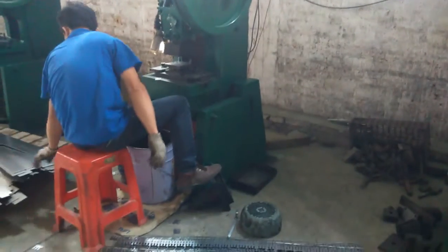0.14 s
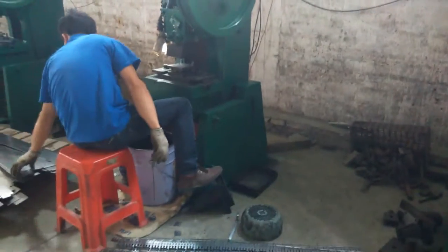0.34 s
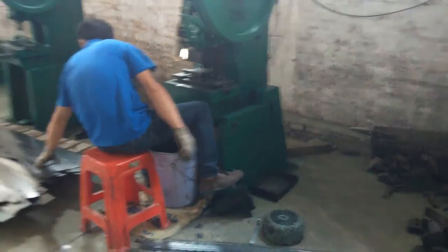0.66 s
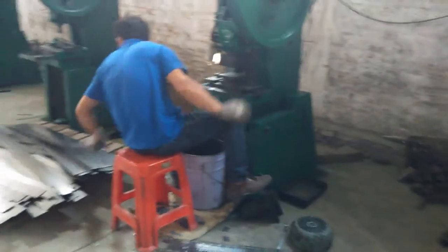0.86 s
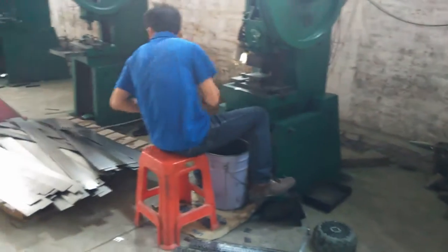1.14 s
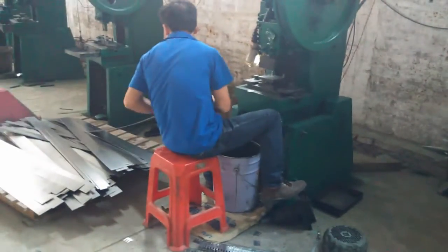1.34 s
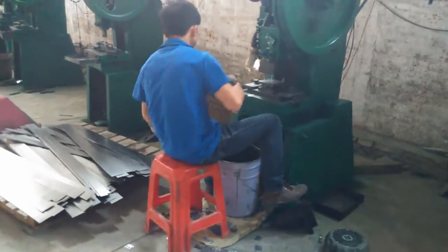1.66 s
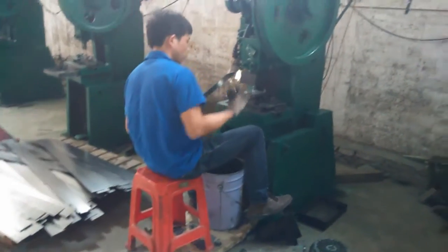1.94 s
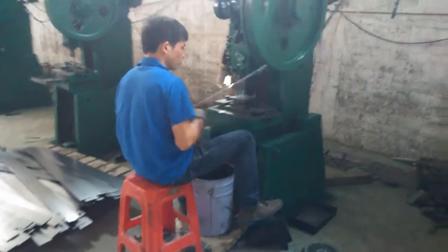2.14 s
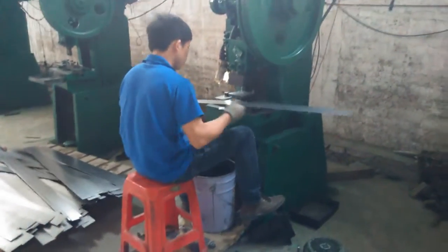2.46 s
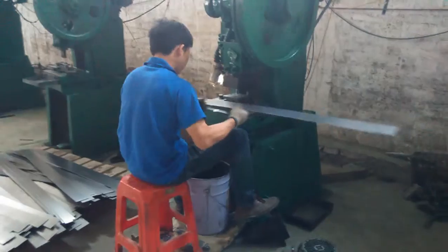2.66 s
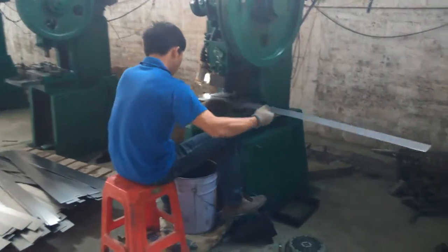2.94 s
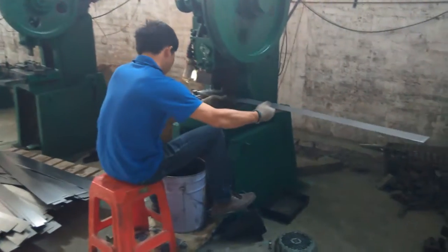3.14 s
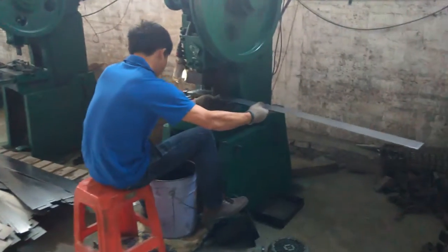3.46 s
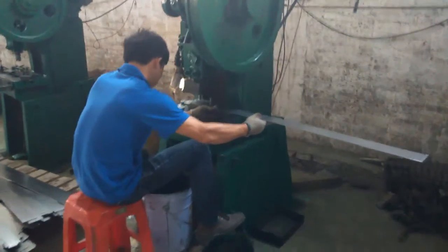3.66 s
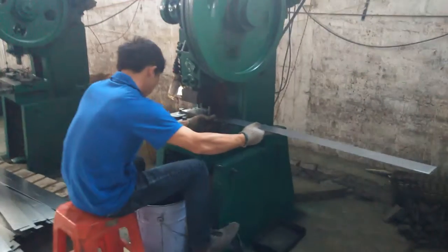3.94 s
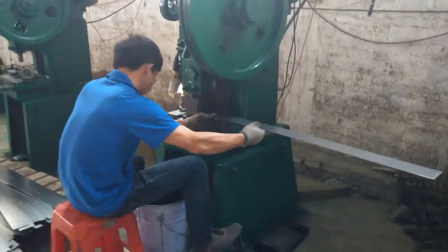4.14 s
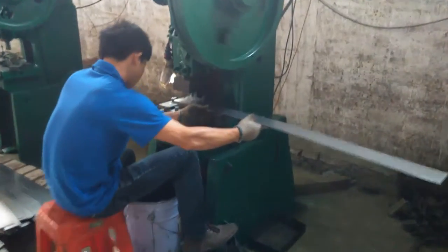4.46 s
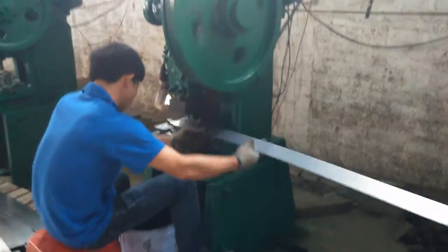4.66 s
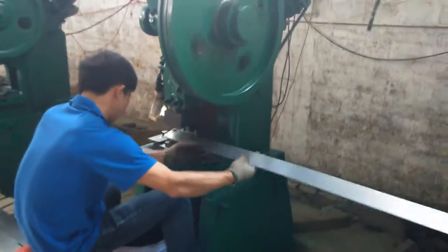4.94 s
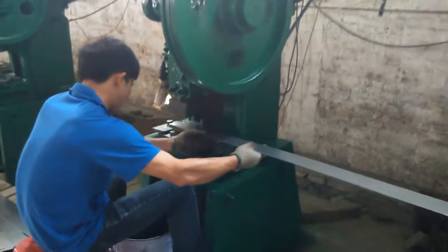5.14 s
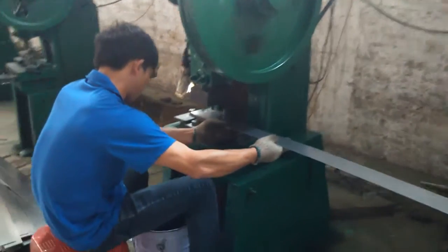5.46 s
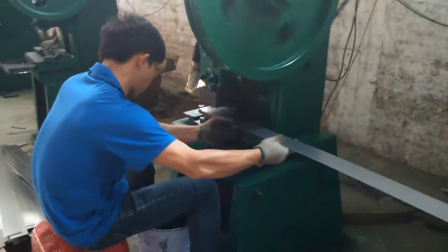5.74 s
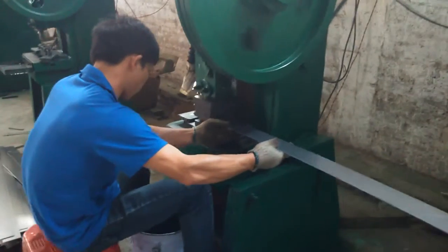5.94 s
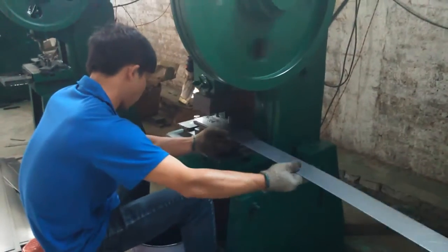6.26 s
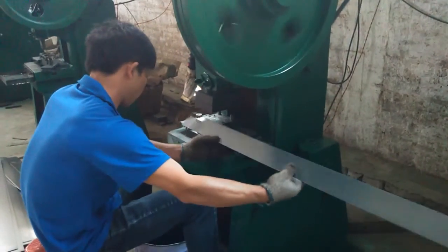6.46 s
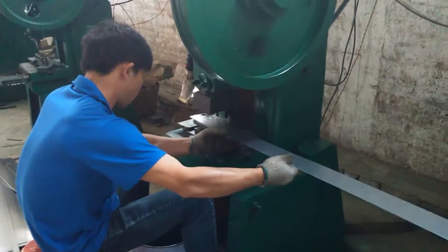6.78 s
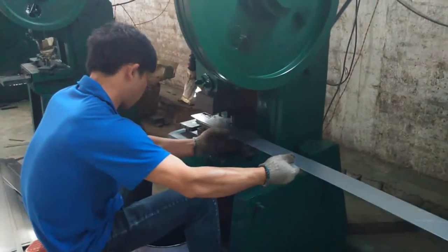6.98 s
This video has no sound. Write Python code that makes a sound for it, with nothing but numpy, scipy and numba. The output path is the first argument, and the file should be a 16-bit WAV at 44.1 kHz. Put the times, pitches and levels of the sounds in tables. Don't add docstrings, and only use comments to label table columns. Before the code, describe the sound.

Steel strip drags with rasping catches, then heavy press strokes bang with bright metallic clanks and tinkling offcuts against steady machine hum.

```python
import sys
import numpy as np
from scipy import signal
from scipy.fft import rfft, irfft, next_fast_len
from scipy.io import wavfile
from scipy.ndimage import uniform_filter1d, minimum_filter1d
from numba import njit

SR = 44100
rng = np.random.default_rng(int(sys.argv[2]) if len(sys.argv) > 2 else 0)


def invert_db(x):
    u = np.asarray(x, float) / 20
    return 10 ** u


def put_to_file(sound):
    columns = np.atleast_2d(sound).T
    safe = np.clip(columns, -1, 1)
    whole_steps = np.round(safe * 32767)
    wavfile.write(sys.argv[1], SR, whole_steps.astype(np.int16))


N = 313551

# (frequency [Hz], level per Hz [dB])
FRAME_COLOUR = [(24, -59), (40, -24), (107, -19.5), (150, -4), (240, -8), (353, -1.5), (407, -5.5),
                (518, -0.5), (589, -10.5), (651, -2.5), (750, -8.5), (817, -5.5), (877, -9.5), (942, -8),
                (1200, -12.5), (1560, -51), (2640, -120)]
# (frequency [Hz], level per Hz [dB])
DIE_COLOUR = [(1200, -3), (1550, 1), (2200, -2), (3300, -7), (4400, -12)]
# (time [s], bass [dB], die block [dB], ring-down by 60 dB [s])
CLUTCH_BLOWS = [
    (1.753, -17.5, -26.5, 0.63),
    (1.819, -21, -19.5, 0.51),
    (3.79, -16.5, -23.5, 0.56),
    (3.889, -19.5, -35.5, 0.59),
    (4.113, -11, -17.5, 0.71),
    (4.623, -12.5, -18, 0.44),
    (5.561, -32, -35.5, 0.51),
    (5.628, -27, -30.5, 1),
    (6.31, -9.5, -13, 0.545),
]
# (time [s], bass [dB], die block [dB], ring-down by 60 dB [s])
CRANK_BLOWS = [(.004, -10, -21, 0.39), (.089, -17, -41, 0.41), (.179, -25, -32, 1.),
               (.344, -25.5, -27, 0.54), (2.14, -9, -16, 0.76), (2.25, -13.5, -22, 0.54),
               (2.319, -16, -35.5, 0.86), (2.448, -15.5, -18.5, 0.75), (2.599, -16.5, -24.5, 0.82),
               (2.82, -23, -42, 0.96), (4.172, -7, -22, 0.476), (4.26, -13, -21.5, 0.74),
               (4.301, -8.5, -10, 0.75), (4.439, -13.5, -19.5, 0.55), (4.76, -25.5, -48, 0.62),
               (6.194, -10, -19, 0.87), (1.9, -26.5, -40, 0.53), (5.8, -14.5, -28, .45),
               (6.409, -15.5, -29, 1.), (6.698, -21, -29, 0.7)]
# (time [s], bass [dB], die block [dB], ring-down by 60 dB [s])
BED_BLOWS = [
    (2.033, -30, -33, 0.87),
    (2.075, -18.5, -27, .94),
    (4.089, -24, -17, 0.4),
    (5.675, -18, -11.5, 0.2),
    (5.789, -7, -12.5, .35),
    (5.983, -8, -9.5, .8),
    (6.101, -13.5, -18, 0.72),
    (6.892, -23, -39.5, .28),
]
# (loudest frame note [Hz], push length [s])
BLOW_KINDS = [
    (170, 0.02),
    (345, 0.009),
    (760, 0.0097),
]
# (time [s], level [dB], frequency [Hz], ring-down [s])
BLOCK_RINGS = [(3.805, -30, 1710, .4), (3.8, -30, 1100, .3), (4.115, -22, 1550, .3), (4.17, -22, 640, .4),
               (4.17, -24, 511, .6), (4.33, -18, 947, .6), (4.4, -25, 1943, .3), (5.69, -24, 3914, .15),
               (5.69, -24, 4775, .12), (5.792, -20, 1588, .26), (5.8, -28, 2840, .4), (5.995, -19, 813, .3),
               (6.0, -24, 1545, .6), (6.1, -20, 511, .9), (6.0, -27, 3860, .6), (4.3, -24, 640, .6)]
# (time [s], level [dB], frequency [Hz])
RAM_BOOMS = [
    (.01, -20.5, 320.6),
    (3.795, -38.5, 60),
    (3.799, -25, 178),
    (5.79, -27, 163),
    (2.141, -12.5, 359.4),
    (4.168, -14, 361),
    (6.197, -12.5, 355),
]
# (time [s], level [dB], ring-down [s])
DIE_CLACKS = [(0.344, -23, 0.19), (1.8093, -13, 0.22), (2.0338, -16, 0.21), (2.4498, -14.5, 0.16),
              (3.7915, -26.5, 0.25), (4.114, -6, 0.25), (4.3084, -6, 0.45), (4.613, -11, 0.27),
              (5.682, -7.5, 0.2), (5.791, -2.5, 0.24), (5.986, -13, 0.28), (6.4092, -16, 0.22),
              (6.8863, -4, 0.19)]
# (frequency [Hz], level per Hz [dB])
STRIP_COLOUR = [(6000, -20), (7500, -5.5), (8200, -3), (9600, -1.), (10800, -4), (11800, -11.5),
                (13500, -17.5), (16000, -26)]
# (time [s], level [dB], lower range relative [dB], ring-down [s])
DIE_CLANKS = [(1.0453, -12, -24, 0.91), (4.0826, -12, -6, .33), (4.0912, -3.5, -14, 0.75),
              (4.285, -0.5, -17.5, 0.43), (4.3189, -8.5, -5.5, 0.546), (4.4394, -9.5, -4, .21),
              (4.6101, -7, -11.5, 0.81), (4.6861, -4.5, -9, .11), (4.7333, 0, -23, 0.22),
              (4.8569, -11, -25.5, 0.108), (5.026, -16, -34, 0.13), (5.1185, -0.5, -30, 0.17),
              (5.2794, -9.5, -28, 0.62), (5.2785, -4, -30, 0.083), (5.63, -11, -16.5, 0.24),
              (5.671, -3.5, -7.5, 0.28), (5.7703, -6, -9, 0.55), (5.9671, -7, -12.5, 0.89),
              (6.0093, -11, -1.5, 0.96), (6.2976, -6, -10.5, 0.37), (6.3617, -7, -5, .18),
              (6.4075, -3.5, -14, 0.33), (6.8847, -2.5, -6, .25), (6.9526, -9, -21, 0.38)]
# (time [s], level [dB], lower range relative [dB], ring-down [s])
PILE_CLANKS = [(.2289, -25.5, -7.5, 1), (.2749, -16.5, -15, 0.39), (.3438, -17.5, -10, 0.38),
               (.8699, -25.5, -29, .97), (1.437, -14, -22, 0.15), (1.8089, -12, -7.5, 0.54),
               (2.043, -14, -7.5, 0.49), (2.15, -14, -12, 0.91), (2.4218, -18.5, -11.5, 0.98),
               (2.5028, -14.5, -11.5, 0.45), (2.5596, -22.5, 1.5, .4), (2.6598, -17.5, -9, 0.56),
               (2.8886, -21, -35, .48), (3.133, -23, -29, 0.26), (3.551, -20.5, -28, .35),
               (3.7867, -22, -9.5, 0.7), (4.582, -17, -11, 0.5), (5.2245, -15, -34, .1),
               (6.4586, -15.5, -17, 0.26), (6.6346, -20.5, -17, 0.41), (6.6994, -17.5, -9.5, 0.44),
               (6.7537, -16, -15, 0.4)]
# (time [s], level [dB], centre [Hz], fall by 60 dB [s])
FIRST_CONTACTS = [(2.030, -17, 10300, 0.055), (2.143, -20, 1500, .2), (2.16, -19, 2400, 0.22),
                  (2.44, -19.5, 1800, .12), (2.545, -23, 5200, .12), (3.5515, -12.5, 10400, 0.058),
                  (4.0925, -9, 9800, .1), (4.112, -15, 1550, 0.22), (4.2888, -13.5, 9800, .1),
                  (4.3082, -13.5, 1540, .15), (4.36, -17, 2000, .15), (4.44, -16, 2500, 0.13),
                  (4.6126, -19, 1350, .12), (4.635, -14, 9000, .2), (4.7345, -6, 9500, .08),
                  (4.8572, -10, 7600, 0.026), (5.1192, -8, 7570, .04), (5.1265, -12, 8000, 0.055),
                  (5.12, -26.5, 2800, 0.054), (5.2788, -14, 8000, .03), (5.6713, -9, 7000, .04),
                  (5.68, -15, 9200, .06), (5.7715, -13, 8500, .05), (5.7909, -12, 1310, 0.19),
                  (5.987, -13, 1100, 0.23), (6.0049, -13, 1930, .2), (6.045, -13.5, 2600, .15),
                  (6.085, -15.5, 3000, .15), (6.11, -15, 1600, .15), (6.365, -17, 8500, 0.085),
                  (6.37, -18, 3000, .12), (6.894, -18, 3400, .08)]
# (time [s], level [dB], centre [Hz], fall by 60 dB [s])
EDGE_TICKS = [(2.043, -16, 8500, .03), (2.4225, -15, 7000, .015), (2.503, -17, 10500, .02),
              (3.552, -12, 10300, .05), (4.734, -10, 9500, .02), (4.741, -11, 9500, .02),
              (4.8565, -11, 8000, .015), (4.865, -12, 10300, .08), (5.027, -14, 10300, .035),
              (5.1192, -7, 8500, .012), (5.126, -9, 10000, .012), (5.12, -16, 6500, .1),
              (5.2255, -19, 13500, .05), (5.2255, -12, 9800, .05), (5.279, -9, 9000, .015),
              (5.28, -16, 13500, .05), (5.12, -14, 13000, .1), (3.51, -33, 4500, .15),
              (5.563, -31, 3500, .15), (5.6305, -16, 8000, .04), (5.7715, -11, 8000, .03),
              (6.7, -24, 4000, .1), (4.34, -13, 3000, .05), (4.385, -15, 4000, .05), (4.66, -17, 3000, .08),
              (6.894, -14, 4000, .03)]
# (time [s], level [dB], centre [Hz])
EDGE_CATCHES = [(1.0459, -13, 8070), (1.0753, -13, 8060), (1.1027, -13, 8900), (1.2165, -9, 9750),
                (1.3317, -8, 9780), (1.4375, -10, 11000), (1.4933, -14, 9190), (1.5452, -15, 9740),
                (1.5831, -10, 9190), (1.6216, -9, 9890), (1.7089, -19, 9340), (1.7662, -10, 9690),
                (1.7996, -6, 9230), (1.859, -9, 9420)]
# (hardest at [s], level [dB], 20 dB rise [s], 20 dB fall [s], lower range relative [dB])
DRAGS = [(0., -22.5, .1, 0.2, -10), (.43, -25, 0.3, 0.27, -10), (.92, -29, 0, 11, -25),
         (1.27, -10.5, 0.24, 0.35, -20.5), (1.63, -15, 0.32, 0.13, -17), (1.8, -13.5, .12, 0.4, -13),
         (2.045, -17, 0.12, 0.58, -7), (2.61, -17, 0.18, 0.44, -10), (3.15, -29.5, 0.8, 2, -25),
         (3.5, -33.5, 0.04, .2, -4), (3.88, -25, 1, 0.32, -17), (4.26, -19, 0.14, 0.04, -4),
         (4.41, -17.5, 0.15, .5, -4.5), (4.7, -25, 0.27, 0.22, -2), (4.92, -23, 0, 0.3, -29),
         (5.29, -23.5, 0.8, 0.15, -20.5), (5.8, -29, 0.38, .3, -5), (6.06, -16, 0.3235, 0.7, -9),
         (6.32, -22, .5, 0.36, -6.5), (6.85, -22.5, 0.85, 0.8, -9)]
# (frequency [Hz], level [dB], ring-down [s])
WASHER_NOTES = [(5870, -21, 0.31), (7810, -9, 0.4), (10330, -4, 0.4), (13600, -12, .55)]
SLUG_NOTES = [(9400, 2, 0.28), (10450, -3, 0.84), (14500, -4, 0.25)]
TAB_NOTES = [(7130, -3, 0.54), (12950, -0.5, 0.47)]
# (time [s], level [dB])
WASHER_DROPS = [
    (4.8564, -1.5),
    (5.2794, -4.5),
    (5.4194, -13),
    (6.9526, -3),
]
SLUG_DROPS = [
    (3.1343, -15.5),
    (3.5518, -14.5),
    (5.2265, -15.5),
]
TAB_DROPS = [
    (4.3216, -19),
    (4.4403, -28),
    (6.0896, -13),
]
# (time [s], level [dB], frequency [Hz], ring-down [s])
SCRAP_PINGS = [(.277, -26., 11050, 0.44), (.39, -27, 10500, 0.21), (0.89, -21, 10430, 0.2),
               (2.043, -22.5, 8430, 1), (2.044, -22, 11200, .3), (2.423, -27, 6600, .2),
               (2.504, -20, 11200, 0.18), (2.51, -24, 9480, 0.64), (2.56, -22.5, 10600, .5),
               (2.889, -26.5, 8560, 0.24), (4.094, -25, 5540, .6), (4.095, -26.5, 5830, .7),
               (4.097, -32, 14300, .4), (4.33, -27, 12950, .45), (5.68, -32, 14200, .2),
               (6.45, -21, 11000, .2), (2.505, -32, 5500, .5), (2.09, -26, 810, 0.21),
               (4.091, -23, 7164, 0.43), (4.091, -21, 10260, 0.22), (4.75, -22.5, 5380, 0.14),
               (5.026, -23, 10400, 0.126), (5.631, -25, 8640, 0.14), (5.68, -17.5, 5740, 0.22),
               (5.78, -22, 8500, 0.23), (6.636, -36, 10620, 0.34), (6.705, -29, 4990, 0.33)]
# (time [s], level [dB])
MOTOR_LEVEL = [
    (0, -54),
    (1.5, -50),
    (3.5, -48.5),
    (4.9, -42),
    (5.3, -40),
    (5.7, -40.5),
    (6.6, -44),
    (7.11, -42.5),
]
# (frequency [Hz], level [dB])
HUM_NOTES = [(140.0, -51), (242.2, -51), (430.7, -52.5), (484.5, -57.5), (613.7, -51.5), (667.5, -51.5),
             (861.3, -50.5), (888.2, -50.5), (974.4, -53.5), (1098, -55.5)]
# (frequency [Hz], level per Hz [dB])
SHOP_COLOUR = [(25, -21.5), (102, -11.5), (137, -3.5), (175, -13.5), (236, -4.5), (300, -6), (463, -6.5),
               (863, -1.5), (1150, -6.5), (1190, -20), (3000, -23), (4800, -28), (10000, -17),
               (16000, -29.5)]
# (time [s], level [dB])
SHOP_LOAD = [
    (0, 3.5),
    (1., -1.5),
    (1.7, 0.5),
    (3., -0.5),
    (3.7, -1),
    (4.9, -1.5),
    (5.3, -5),
    (5.6, -2.5),
    (6.8, 2.5),
    (7.11, -1.5),
]
# (frequency [Hz], correlation)
LIKENESS = [(50, 0.58), (140, 0.98), (400, 0.81), (1000, 0.19), (2000, -0.031)]
# (frequency [Hz], left minus right [dB])
LEFT_LEAN = [(100, 6), (1000, 3), (3000, 4), (6000, 6), (10000, 15)]


def on_log(table, hz):
    f, v = np.transpose(table)[:2]
    return np.interp(np.log(np.maximum(hz, 1)), np.log(np.maximum(f, 1)), v)


def curve(table):
    times, values = np.transpose(table)
    return np.interp(np.arange(N) / SR, times, values)


def walk(rate):
    k = int(SR / rate)
    held = np.repeat(rng.standard_normal(N // k + 1), k)
    return uniform_filter1d(uniform_filter1d(held, k), k)[:N]


def hiss(table, lo_hz, hi_hz):
    size = next_fast_len(N)
    hz = np.arange(size // 2 + 1) * SR / size
    mid, side = rfft(rng.standard_normal((2, size)))
    like = np.clip(on_log(LIKENESS, hz), -.5, .99)
    mid, side = mid * np.sqrt(1 + like), side * np.sqrt(1 - like)
    gain = invert_db(on_log(table, hz)) * (hz > lo_hz) * (hz < hi_hz)
    lean = invert_db(on_log(LEFT_LEAN, hz) / 2)
    x = irfft(gain * np.array([(mid + side) * lean, (mid - side) / lean]), size)[:, :N]
    return x / np.sqrt(np.mean(x.mean(0) ** 2))


@njit
def ring(start, hz, t60, push, left, right, rough, shake, place):
    out = np.zeros((2, N))
    for m in range(len(hz)):
        turn = np.exp(2j * np.pi * hz[m] / SR - np.log(1000) / (t60[m] * SR))
        z, rest, slack = 1 + 0j, 1., np.exp(-1 / (push[m] * SR))
        for i in range(start[m], min(N, start[m] + int(.65 * t60[m] * SR))):
            z, rest = z * turn, rest * slack
            w = (1 - rest) * z * (1 - rough + rough * shake[(i + place[m]) % N])
            out[0, i] += (w * left[m]).imag
            out[1, i] += (w * right[m]).imag
    return out


def modes(s, hz, db, t60, push, pan_db, rough, shake_hz, count, spread_db=0):
    a, b, c, d, e = rng.standard_normal((len(s), count, 5)).transpose(2, 0, 1)
    like = np.clip(on_log(LIKENESS, hz), 0, .99)
    mid = np.exp(9j * a) * np.sqrt(1 + like)
    side = np.exp(9j * a + 1j * np.pi / 2 * np.sign(b) + .5j * c) * np.sqrt(1 - like)
    size, lean = invert_db(db + spread_db * d), invert_db(pan_db / 2)
    flat = lambda v: np.ascontiguousarray(np.broadcast_to(v, hz.shape)).ravel()
    start = flat((s[:, None] * SR).astype(np.int64))
    shake = (walk(shake_hz) + 1j * walk(shake_hz)) / np.sqrt(2)
    shake = shake[np.arange(N) * (2 if shake_hz > 240 else 1) % N]
    return ring(start, flat(hz), flat(np.clip(t60, .02, 3)), flat(np.clip(push, 1e-4, .2)),
                flat(size * lean * (mid + side)), flat(size / lean * (mid - side)),
                float(np.clip(rough, 0, 1)), shake, flat((np.abs(e) * N).astype(np.int64)))


def plate(s, db, t60, push, pan_db, shape, lo_hz, hi_hz, shake_hz, count):
    u, v = rng.random((len(s), count, 2)).transpose(2, 0, 1)
    hz = lo_hz * (hi_hz / lo_hz) ** ((np.arange(count) + u) / count)
    colour = shape(hz) + 10 * np.log10(hz)
    colour = colour - 10 * np.log10(np.sum(invert_db(2 * colour), 1, keepdims=True))
    return modes(s, hz, db[:, None] + colour, t60[:, None] * (0.77 + 0.69 * v), push, pan_db,
                 rough=.93, shake_hz=shake_hz, count=count, spread_db=2.4)


def frame():
    parts = CLUTCH_BLOWS, CRANK_BLOWS, BED_BLOWS
    s, bass_db, die_db, t60 = np.concatenate(parts).T
    note_hz, push = np.repeat(BLOW_KINDS, [len(p) for p in parts], axis=0).T

    def favour(hz):
        closeness = np.exp(-(np.log(hz / note_hz[:, None]) / 0.16) ** 2)
        return on_log(FRAME_COLOUR, hz) + 4.5 * closeness

    body = plate(s, bass_db - 0.5, t60, push[:, None], 2.6, favour, 45, 1250, shake_hz=62, count=50)
    die = plate(s, die_db - 1.0, 1.013 * t60, 0.3 * push[:, None], 0.8,
                lambda hz: on_log(DIE_COLOUR, hz), 1200, 4400, shake_hz=130, count=36)
    return body + die


def ram():
    s, db, hz = np.transpose(RAM_BOOMS)
    turn = np.arange(7)
    echo_s, echo_db = .078, -5.5
    s = s[:, None] + echo_s * turn * (1 + .06 * rng.standard_normal((len(s), 7)))
    db = (db[:, None] + echo_db * turn).reshape(-1, 1)
    hz = np.repeat(hz, 7)[:, None] * [.93, 1, 1.06]
    return modes(s.ravel(), hz, db, 0.32, 0.004, 2.4, rough=0.37, shake_hz=40, count=3)


def clacks():
    s, db, t60 = np.transpose(DIE_CLACKS)
    return plate(s, db - 10.0, t60, 0.00086, 0.34, lambda hz: -hz / 3000.0, 1200, 6500,
                 shake_hz=260, count=40)


def strip(clanks, pan_db, top_db):
    s, db, low_db, t60 = np.transpose(clanks)
    main = plate(s, db - 6.5, t60, 0.00056, pan_db, lambda hz: on_log(STRIP_COLOUR, hz),
                 5200, 12500, shake_hz=250, count=40)
    low = plate(s, db + low_db + 0.5, 0.86 * t60, 0.0028, 0.71 * pan_db, lambda hz: hz / 636.0,
                2700, 7200, shake_hz=260, count=30)
    top = plate(s, db + top_db, 0.95 * t60, 0.001, pan_db, lambda hz: -hz / 620.0,
                11500, 15800, shake_hz=250, count=24)
    return main + low + top


def cracks(table):
    out = np.zeros((2, N))
    since = np.arange(int(.3 * SR)) / SR
    for s, db, hz, t60 in table:
        i = int(s * SR)
        edges = np.clip(hz * 2 ** (.32 * np.array([-1, 1])), 100, .45 * SR)
        band = signal.butter(2, edges, "band", fs=SR, output="sos")
        mid, side = rng.standard_normal((2, len(since)))
        burst = signal.sosfilt(band, [mid + side, mid - side])
        burst = burst / burst.std() * invert_db(db - 3.5 - 60 * since / max(t60, .01))
        out[:, i:i + len(since)] += burst[:, :N - i]
    pan_db = 4.5
    return out * invert_db(np.array([[pan_db], [-pan_db]]) / 2)


def slide():
    s, db, rise, fall, low_db = np.transpose(DRAGS)[:, :, None]
    since = np.arange(N) / SR - s
    force_db = db - 20 * np.where(since < 0, -since / rise, since / fall)
    total = lambda level_db: np.sqrt(np.sum(invert_db(2 * level_db), axis=0))
    grit = lambda: invert_db(2.4 * walk(25) + 2.0 * walk(120))
    upper = 0.82 * grit() * hiss(STRIP_COLOUR, 5300, 9200) + grit() * hiss(STRIP_COLOUR, 9200, 15800)
    upper = total(force_db - 5.5) * upper * 0.8
    low_colour = [(1500, -11), (3000, -10), (4500, -3), (5800, -0.5), (7000, -2.5)]
    lower = total(force_db + low_db - 4.5) * grit() * hiss(low_colour, 1300, 7000)
    return upper + lower


def offcuts(drops, notes, trim_db):
    s, db = np.transpose(drops)
    hz, share_db, t60 = np.repeat(notes, 3, axis=0).T
    hz = hz * (1 + .006 * np.tile([-1, 0, 1], len(notes)))
    return modes(s, hz + 0 * s[:, None], db[:, None] + share_db + trim_db - 2., t60, 0.001, 12.6,
                 rough=0.9, shake_hz=110, count=len(hz))


def lone_rings(table, pan_db, shake_hz):
    s, db, hz, t60 = np.transpose(table)[:, :, None]
    return modes(s[:, 0], hz * [.995, 1.005], db, t60, 0.0008, pan_db, rough=0.88,
                 shake_hz=shake_hz, count=2)


@njit
def walls(x, lags, gain, damp):
    line, soft, out = np.zeros((8, 8192)), np.zeros(8), np.zeros((2, len(x)))
    for i in range(len(x)):
        total = 0.
        for k in range(8):
            soft[k] += (1 - damp) * (gain[k] * line[k, (i - lags[k]) & 8191] - soft[k])
            total += soft[k]
            out[k % 2, i] += soft[k]
        for k in range(8):
            line[k, i & 8191] = x[i] + soft[k] - total / 4
    return out


def hall(near):
    t60, level_db = 1.17, -14
    lags = rng.integers(900, 3500, 8)
    left, right = walls(near.mean(0) + 1e-18, lags, invert_db(-60 * lags / SR / t60), .51)
    apart = signal.lfilter(*signal.butter(1, 700, "high", fs=SR), left - right)
    return invert_db(level_db) * np.array([left + right + apart, left + right - apart]) / 2


def note(hz, wander_hz):
    return np.sin(2 * np.pi * np.cumsum(hz + wander_hz * walk(25)) / SR)


def belt():
    t = np.arange(N) / SR
    from_s, to_s, fade_s = 2.97, 3.11, .05
    sings = np.clip(np.minimum(t - from_s, to_s - t) / fade_s + 1, 0, 1)
    return sings * invert_db(-34.5 + 3.5 * walk(20)) * note(810, 9)


def motors():
    hum = sum(invert_db(db + 5.0 + 1.8 * walk(6)) * note(hz, 2.5) for hz, db in HUM_NOTES)
    rumble = hiss([(105, -17), (142, 2), (190, -13)], 100, 210)
    return invert_db(.5 * curve(SHOP_LOAD)) * hum + invert_db(curve(MOTOR_LEVEL) + 2.2 * walk(9)) * rumble


def shop():
    bass = invert_db(1.1 * walk(3.2) + 0.97 * walk(13)) * hiss(SHOP_COLOUR, 20, 1170) * invert_db(-2.5)
    treble = invert_db(0.84 * walk(4.2)) * hiss(SHOP_COLOUR, 1170, 17000) * invert_db(-3.0)
    return invert_db(-34.5) * (invert_db(curve(SHOP_LOAD)) * bass + treble)


def scene():
    near = frame() + ram() + clacks()
    near = near + strip(DIE_CLANKS, pan_db=4, top_db=-19) + strip(PILE_CLANKS, pan_db=14, top_db=-16)
    near = near + cracks(FIRST_CONTACTS)
    near = near + offcuts(WASHER_DROPS, WASHER_NOTES, -13.5)
    near = near + offcuts(SLUG_DROPS, SLUG_NOTES, -8.) + offcuts(TAB_DROPS, TAB_NOTES, -7.0)
    near = near + lone_rings(SCRAP_PINGS, 13.5, 200)
    catches = [(s, db - 9, hz, .07) for s, db, hz in EDGE_CATCHES]
    dry_only = cracks(EDGE_TICKS + catches) + lone_rings(BLOCK_RINGS, 1.5, 60) + slide()
    return near + dry_only + hall(near) + belt() + motors() + shop()


def starve(x):
    hz, _, z = signal.stft(x, SR, nperseg=2048, noverlap=1536)
    power = np.abs(z.mean(0)) ** 2 + 1e-20
    patch = uniform_filter1d(power, size=9, axis=0)
    around = np.exp(uniform_filter1d(np.log(patch), size=60, axis=0))
    bright = power[(hz > 7500) & (hz < 11500)].mean(0)
    masking = .12
    margin_db = -5.0 + .4 * (hz[:, None] > 11700)
    keep = patch > around ** (1 - masking) * bright ** masking * invert_db(2 * margin_db)
    keep = minimum_filter1d(minimum_filter1d(1. * keep, size=11, axis=0), size=2, axis=1)
    keep[hz < 2700] = 1
    ring_power = patch[(hz > 12600) & (hz < 13700)].max(0)
    above = patch[(hz > 14200) & (hz < 15500)].mean(0)
    keep[np.ix_(hz > 14400, ring_power / above > invert_db(2 * 14))] = 0
    return signal.istft(z * keep, SR, nperseg=2048, noverlap=1536)[1][:, :N]


def low_pass(x):
    return signal.sosfilt(signal.butter(12, 15900, fs=SR, output="sos"), x)


def record(dry):
    rounded = np.tanh(dry)
    mix = starve(rounded)
    return low_pass(mix)


dry = scene()
out = record(dry)
put_to_file(out)
```